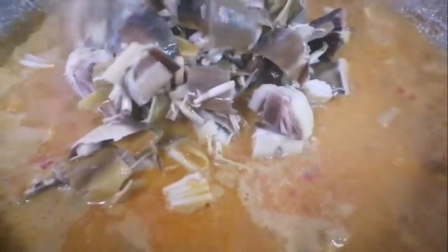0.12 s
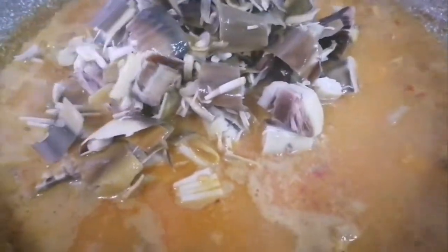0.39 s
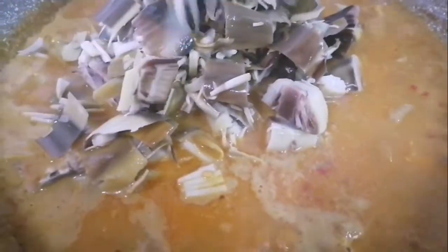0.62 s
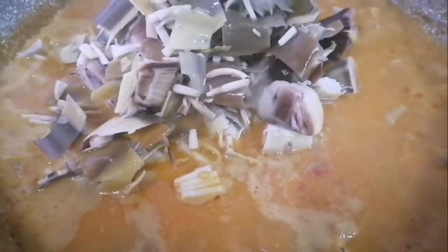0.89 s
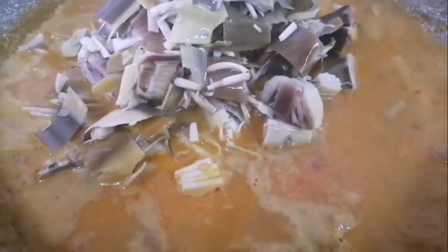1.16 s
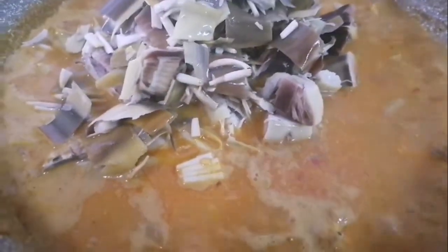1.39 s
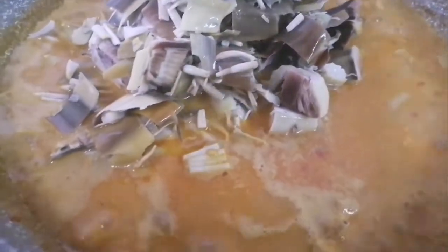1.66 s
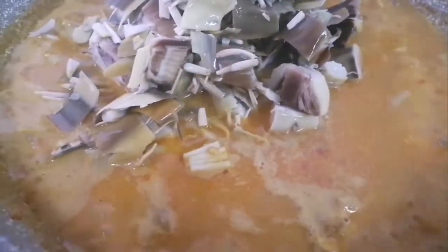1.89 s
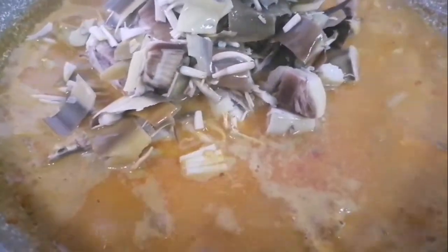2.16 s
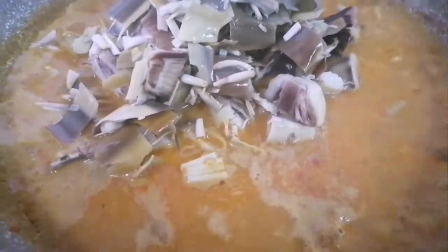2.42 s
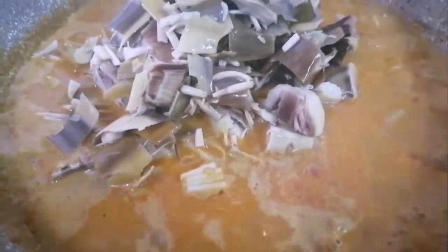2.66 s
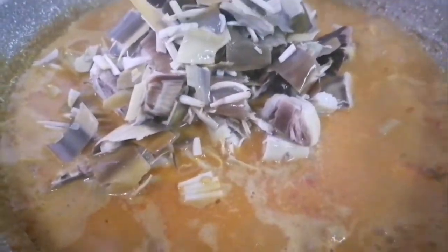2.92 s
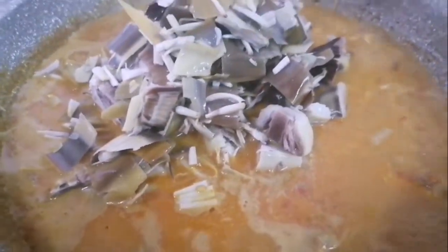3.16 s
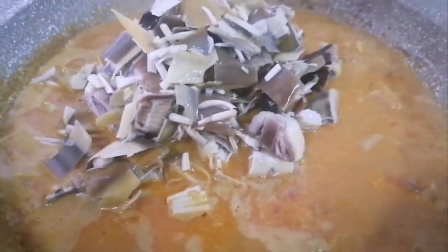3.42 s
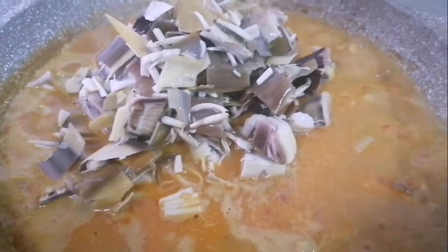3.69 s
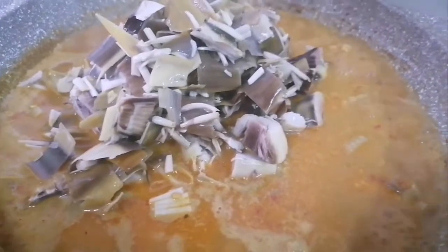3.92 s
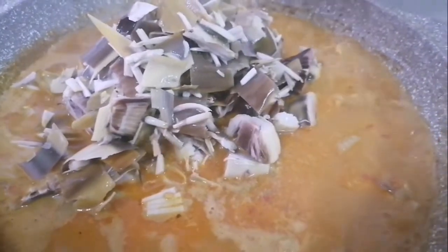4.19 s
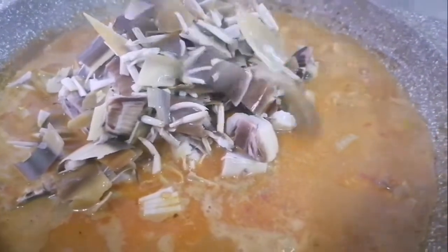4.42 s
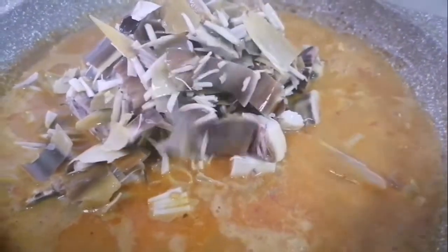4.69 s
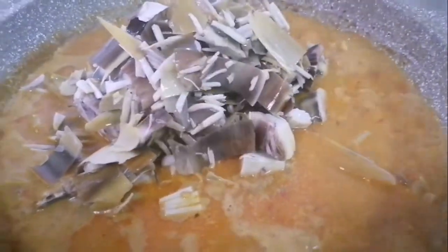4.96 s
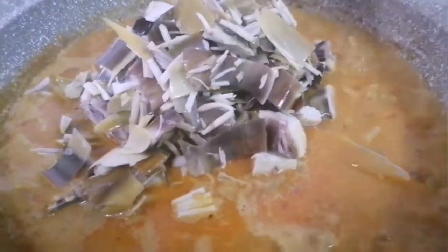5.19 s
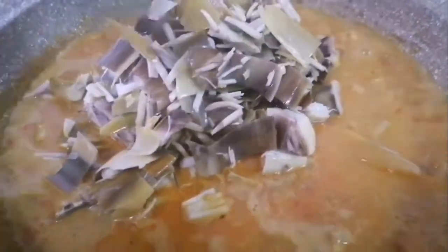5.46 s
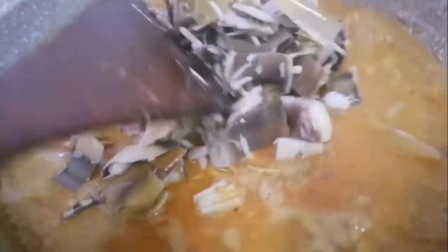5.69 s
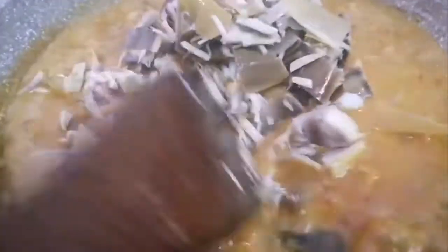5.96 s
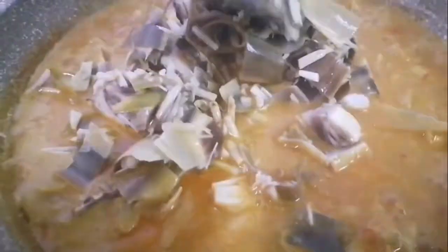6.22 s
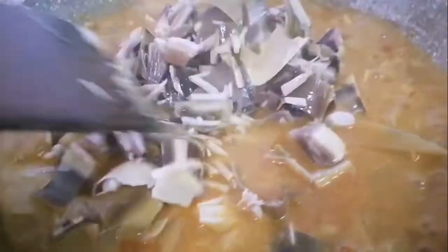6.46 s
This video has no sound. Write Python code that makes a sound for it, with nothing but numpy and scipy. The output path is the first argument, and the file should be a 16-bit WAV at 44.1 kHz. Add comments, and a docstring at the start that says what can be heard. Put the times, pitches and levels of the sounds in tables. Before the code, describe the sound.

A wooden spatula knocks and scrapes a hollow bowl in uneven bursts while thick sauce bubbles and pops over a softly hissing gas burner.

```python
"""A gas burner hisses with a low flutter: shaped noise with random gusts. Thick sauce simmers over it, its
bubbles popping as short rising sines and its drops spitting as noise cracks. A wooden spatula knocks and scrapes
a hollow bowl to tip chopped vegetables into the pan: damped modes for the blows, low sines for the bumps,
uneven noise for the strokes. A small kitchen answers with a short decaying noise tail."""
import sys
import numpy as np
from scipy import signal
from scipy.fft import rfft, irfft, next_fast_len
from scipy.io import wavfile
from scipy.ndimage import uniform_filter1d, map_coordinates

SR = 44100
rng = np.random.default_rng(int(sys.argv[2]) if len(sys.argv) > 2 else 0)


def convert_level_to_amplitude(level_db):
    """Map a level in decibels to its linear amplitude factor."""
    exponent = np.asarray(level_db, float) / 20
    return 10 ** exponent


def store_wav(level_fs):
    """Save 16-bit WAV to argv[1]."""
    pcm = np.round(np.clip(np.atleast_2d(level_fs), -1, 1) * 32767)
    wavfile.write(sys.argv[1], SR, pcm.T.astype(np.int16))


N = 290614


def unit(x):
    """Scaled to rms 1."""
    return x / np.sqrt(np.mean(x ** 2) + 1e-20)


def along(points, hz):
    """(Hz, value) points interpolated on a log frequency axis."""
    point_hz, values = np.transpose(points)
    return np.interp(np.log(hz + 1), np.log(point_hz + 1), values)


def curves(rows):
    """One value per sample for each column after the time."""
    knot_s, *columns = np.transpose(rows)
    return [np.interp(np.arange(N) / SR, knot_s, column) for column in columns]


def wobble(rate_hz):
    """A smooth random curve with rate_hz knots a second."""
    knots = rng.standard_normal(int(N * rate_hz / SR) + 4)
    return map_coordinates(knots, [np.arange(N) * rate_hz / SR])


def filtered(x, response):
    """x times a complex response of frequency."""
    size = next_fast_len(N + SR // 2)
    hz = np.fft.rfftfreq(size, 1 / SR)
    return irfft(rfft(x, size) * response(hz), size)[..., :N]


def rush(spectrum, alike):
    """Stereo noise of rms 1, its two sides alike by frequency."""
    def mid_side(hz):
        turn = np.arccos(np.clip(along(alike, hz), -1, 1)) / 2
        return convert_level_to_amplitude(along(spectrum, hz)) * [np.cos(turn), np.sin(turn)]

    mid, side = filtered(rng.standard_normal((2, N)), mid_side)
    return unit(np.array([mid + side, mid - side]))


def patchy(x, depth_db):
    """Random patches of gain over time and frequency."""
    z = signal.stft(x, nperseg=512)[2]
    field = uniform_filter1d(rng.standard_normal(z.shape[1:]), size=10, axis=0)
    field = uniform_filter1d(field, size=8, axis=1)
    return signal.istft(z * convert_level_to_amplitude(depth_db * unit(field)), nperseg=512)[1][:, :N]


def sides(pan_db):
    """Left and right gains for a left-right difference in dB."""
    return convert_level_to_amplitude(np.array([pan_db / 2, -pan_db / 2]))


def add(out, s, sound):
    """Mix a stereo sound in at a time in seconds."""
    start = round(s * SR)
    out[:, start:start + sound.shape[1]] += sound


# Room decay. Each row: frequency in Hz, t60 in s.
ROOM_T60 = [(150, 0.21), (1000, 0.19), (8000, 0.078)]


def kitchen(x):
    """Room answer as decaying noise: each frequency dies at its own speed."""
    hz, t, z = signal.stft(rng.standard_normal((2, SR // 2)), SR, nperseg=256)
    decay = convert_level_to_amplitude(-60 * t / along(ROOM_T60, hz)[:, None])
    tail = signal.istft(z * decay, SR, nperseg=256)[1]
    delayed = np.pad(x, ((0, 0), (300, 0)))
    return signal.fftconvolve(delayed, tail / np.linalg.norm(tail[0]), axes=1)[:, :N]


# Low flame flutter. Each row: time in s, level in dB before the gusts.
FLUTTER_LEVEL = [(0.0, -58), (1.63, -52.5), (4.0, -53), (5.5, -57.5), (6.59, -52.5)]
# Gas hiss spectrum. Each row: frequency in Hz, relative density in dB.
HISS_SPECTRUM = [(130, -47), (220, -0.5), (391, -5.5), (657, -2), (758, -5), (2220, -10.5), (2520, -8),
                 (3300, -11.5), (3740, -18.5), (5360, -5.5), (7670, -14), (8700, -10), (13600, -23),
                 (14900, -16), (16000, -45)]
# Flutter spectrum. Each row: frequency in Hz, relative density in dB.
FLUTTER_SPECTRUM = [(12, -33), (20, -17), (64, -5.5), (97, 1.5), (150, 1.5), (167, -5.5), (199, -2),
                    (260, -49), (340, -49), (570, -120)]
# Stereo likeness of wide noise. Each row: frequency in Hz, left-right likeness 0-1.
LIKENESS = [(60, 0.89), (240, 0.9), (950, 0.55), (3770, 0.0067), (15000, 0.013)]


def burner():
    """A nearly steady, patchy gas jet hisses over the flame's low, unsteady flutter."""
    flutter_db, = curves(FLUTTER_LEVEL)
    gusts = convert_level_to_amplitude(2.5 * wobble(15) + 1.2 * wobble(5))
    jet = patchy(rush(HISS_SPECTRUM, LIKENESS), depth_db=1.5)
    hiss = convert_level_to_amplitude(-55.5 + 0.15 * wobble(4.9) + 1.47 * wobble(24)) * jet
    return hiss + convert_level_to_amplitude(flutter_db) * gusts * rush(FLUTTER_SPECTRUM, LIKENESS)


# Bubbles popping at set times, mostly loud, a few faint. Each row: start in s, level in dB, nominal pitch in Hz.
TIMED_POPS = [(0.3765, -30, 2620), (0.9562, -33.5, 2440), (1.03, -37.5, 1870), (1.222, -43, 2200),
              (1.29, -45, 1710), (1.358, -39, 2290), (1.738, -33, 1930), (1.851, -41, 1120),
              (2.061, -36, 1200), (2.175, -36.5, 2190), (2.2354, -45, 2500), (2.577, -32.5, 1850),
              (2.617, -31.5, 2540), (2.692, -35, 1410), (2.716, -33, 1900), (3.0254, -29.5, 1570),
              (3.244, -35, 1900), (3.317, -36, 1800), (3.6514, -34.5, 1670), (4.0187, -36, 1970),
              (4.875, -52, 1170), (4.969, -41, 2500), (5.266, -31, 1940), (5.38, -40.5, 1470),
              (5.596, -42.5, 1110), (6.163, -31.5, 1160), (6.2637, -34.5, 1900), (6.4, -37, 2400)]


def bubbles():
    """Bubbles burst through the thick sauce: a few cycles each, the pitch rising."""
    random_count, decay_cycles = 220, 2.5
    start_s = rng.random(random_count) * N / SR
    level_db = -43 - 11 * rng.random(random_count)
    pitch_hz = 1600 * np.exp(0.45 * rng.standard_normal(random_count))
    pops = [*TIMED_POPS, *np.c_[start_s, level_db, pitch_hz]]
    lives = np.exp(rng.normal(0, 0.3, len(pops)))
    out, t = np.zeros((2, N + SR)), np.arange(SR // 20) / SR
    for (s, db, hz), life in zip(pops, lives):
        cycles = hz * t
        tone = np.sin(2 * np.pi * cycles * (0.969 + 0.0074 * cycles))
        pop = tone * np.exp(-cycles / (life * decay_cycles)) * (1 - np.exp(-t / 0.0001))
        add(out, s, convert_level_to_amplitude(db) * np.outer(sides(rng.normal(-4.5, 6.1)), pop))
    return out[:, :N]


# Drops spitting on the hot rim. Each row: start in s, level in dB before the treble filter.
LOUD_SPITS = [(0.444, -14), (2.199, -15), (2.2478, -21), (2.2702, -6.5), (2.2844, -5), (2.3064, -28),
              (4.9252, -17), (5.9944, -25)]
# Treble spectrum of spits, edge ticks and rasps. Each row: frequency in Hz, relative density in dB.
RASP_SPECTRUM = [(590, -66), (1000, -11), (1940, -19), (2410, -7.5), (3710, -18.5), (4570, -12),
                 (8650, -11.5), (14900, -24.5), (16000, -48)]


def spits():
    """Tiny bright cracks of sauce, a few loud and many faint: noise bursts dying within milliseconds."""
    faint = rng.random((150, 2))
    faint_rows = np.c_[faint[:, 0] * N / SR, -49 - 8 * faint[:, 1]]
    out, t = np.zeros((2, N + SR)), np.arange(400) / SR
    for s, db in [*LOUD_SPITS, *faint_rows]:
        add(out, s, convert_level_to_amplitude(db - 60 * t / 0.0075) * rng.standard_normal((2, 400)))
    return filtered(out[:, :N], lambda hz: convert_level_to_amplitude(along(RASP_SPECTRUM, hz)) * hz ** 2 / (hz ** 2 + 4000 ** 2))


# The bowl moves to the left. Each row: time in s, left-right difference in dB, scaled by each user.
BOWL_PAN = [(0, -3), (2.9, -7.5), (3.05, 5), (5.4, 4)]


def swing(s):
    """Left-right dB of the bowl at a time in seconds."""
    return np.interp(s, *np.transpose(BOWL_PAN))


# The bowl bumps against hand and counter. Each row: start in s, push level in dB, push pitch in Hz.
BUMPS = [(0.425, -29, 151), (0.47, -18, 163), (0.971, -48, 111), (1.13, -39, 73), (1.324, -44.5, 100),
         (1.577, -26.5, 143), (1.999, -37.5, 142), (3.056, -27.5, 123), (3.106, -41, 150),
         (3.559, -30.5, 234), (3.663, -37.5, 55.6), (4.22, -37.5, 73), (4.297, -30, 143), (4.648, -32, 120),
         (4.698, -31.5, 134), (4.996, -26, 170), (5.007, -30.5, 232), (5.029, -32, 190)]


def thumps():
    """A soft low push that dies in a few cycles; the counter answers late with its slow mode."""
    out, t = np.zeros((2, N + SR)), np.arange(SR // 3) / SR
    counter = convert_level_to_amplitude(-0.5) * np.sin(2 * np.pi * 65 * t) * (t / 0.044) * np.exp(1 - t / 0.033)
    rested = np.diff([-1, *np.transpose(BUMPS)[0]]) > 0.03  # quick rebounds do not reach the counter
    for (s, db, hz), fresh in zip(BUMPS, rested):
        push = np.sin(2 * np.pi * hz * t) * (1 - np.exp(-t / 0.00058)) * np.exp(-t * hz / 2.1)
        # the hand cushions hard bumps, so the counter's answer grows less than the push
        answer = fresh * convert_level_to_amplitude(0.3 * db - 38) * counter
        add(out, s, np.outer(sides(1.2 * swing(s)), convert_level_to_amplitude(db) * push + answer))
    return out[:, :N]


def strokes(rows, shape):
    """Sum of (start s, length s, dB) strokes, each shaped over its progress 0-1."""
    t = np.arange(N) / SR
    return sum(convert_level_to_amplitude(db) * shape(np.clip((t - s) / length, 0, 1)) for s, length, db in rows)


# Vegetables slide along the bowl. Each row: start in s, length in s, rumble level in dB before shaping.
SLIDES = [(0.137, 0.097, -43.5), (0.5, 0.058, -45.5), (0.64, 0.048, -48), (1.052, 0.085, -50),
          (1.245, 0.13, -45), (1.506, 0.26, -43.5), (1.69, 0.09, -48), (1.91, 0.098, -41),
          (2.0, 0.095, -46), (2.2, 0.06, -42), (2.278, 0.045, -39), (2.653, 0.15, -44.5),
          (2.816, 0.08, -39), (3.34, 0.085, -53.5), (4.411, 0.066, -44.5), (5.06, 0.15, -44),
          (5.33, 0.048, -51)]
# The spatula's edge rasps. Each row: start in s, length in s, level in dB before shaping.
EDGE_RASPS = [(0.137, 0.068, -54.5), (2.111, 0.19, -44.5), (2.215, 0.12, -43.5), (2.653, 0.096, -52.5),
              (3.614, 0.073, -46), (5.007, 0.28, -57.5), (5.78, 0.41, -55)]
# Slip noise driving the bowl. Each row: frequency in Hz, relative density in dB.
SLIP_SPECTRUM = [(150, -42), (320, -8), (600, 2), (800, -8), (1200, -19), (2500, -11.5), (4000, -31)]


def drag():
    """Uneven slips rumble in the bowl, fading along the stroke, while the edge rasps in the treble, growing."""
    t = np.arange(N) / SR
    # pieces shaken by each blow slide on
    settle_delay_s, settle_length_s, settle_db = 0.0048, 0.15, -32
    settling = [(s + settle_delay_s, settle_length_s, db + settle_db) for s, db, *_ in BLOWS]
    rumble = strokes(SLIDES + settling, lambda u: (u * (1 - u)) ** 0.5 * (1.5 - u))
    rasp = strokes(EDGE_RASPS, lambda u: np.sin(np.pi * u ** 1.6))

    def hollow(f, width_hz=45):
        """Bowl resonances beside a direct path."""
        modes = BOWL_MODES[0] + BOWL_MODES[1] + BOWL_MODES[2]
        return 1.26 + sum(convert_level_to_amplitude(db) * 1j * f * width_hz / (c * c - f * f + 1j * f * width_hz)
                          for c, db, _ in modes)

    lumps = convert_level_to_amplitude(5 * wobble(70) + 2 * wobble(20))
    slips = filtered(lumps * rush(SLIP_SPECTRUM, LIKENESS), hollow)
    low = rumble * unit(slips) * sides(swing(t))
    # loose pieces rattle against the wall as the bowl is scraped
    clatter = convert_level_to_amplitude(8 * wobble(150))
    rattle_noise = rush([(500, -23), (1000, 6), (2600, -18.0), (4000, -19)], [(1000, 0.19)])
    rattle = convert_level_to_amplitude(-12) * rumble * unit(clatter * rattle_noise)
    grit = convert_level_to_amplitude(4.5 * wobble(200) + 1.5 * wobble(40))
    edge = patchy(grit * rush(RASP_SPECTRUM, [(1000, 0.064)]), depth_db=2.5)
    return low + rattle + rasp * unit(edge)


def ring(modes, t, scatter_rad):
    """Damped modes, each strike varying their strength, pitch and phase."""
    total = 0
    for hz, db, t60_s in modes:
        decay = convert_level_to_amplitude(db + rng.normal(0, 1) - 60 * t / t60_s)
        phase = 2 * np.pi * hz * rng.normal(1, 0.019) * t + rng.normal(0, scatter_rad)
        total = total + decay * np.sin(phase)
    return total


# Blows on the bowl. Each row: start in s, overall level in dB, then relative levels in dB of the deep modes,
# the upper modes and the high modes (hardness of contact).
BLOWS = [(0.165, -45, 1, -0.5, -22), (0.426, -26, -8.5, -4, -16), (0.467, -25, -4.5, -1.5, -22),
         (0.49, -31.5, 0, -1.5, -2.5), (1.061, -43.5, -3.5, -2.5, -31), (1.114, -42, -2, -8, -25),
         (1.1437, -37, -3.5, -3.5, -5), (1.322, -44, -13, 2.5, -10), (1.469, -30, -26, 0.5, -25),
         (1.558, -33, -4, 0, -5.5), (1.573, -28, -6, -15, -3.5), (1.686, -44, -3, 12, -1.5),
         (1.726, -46, -5, -6, -2.5), (1.897, -26.5, -6, 1.5, -3), (1.987, -26, -6.5, -10, -6),
         (2.589, -48, -1, 2, -1.5), (2.672, -50, -3, 4.5, 8), (2.742, -19.5, -8, -6.5, -22),
         (2.76, -31, -6, 2.5, -14), (3.058, -25, 5, -0.5, -2.5), (3.11, -30.5, -4, -4, -6),
         (3.401, -34, -3.5, -3.5, -13), (3.664, -36.5, -3, 3, -3.5), (4.215, -27, 1, 4, -0.5),
         (4.29, -19, -4.5, -1.5, -8.5), (4.304, -29.5, -3, -3, -26), (4.645, -30, -3, 3.5, -4.5),
         (4.696, -26.5, 7.5, 3.5, -0.5), (4.9945, -26, 0.5, -2, -5.5), (5.23, -24, -1, 1.5, -15),
         (5.236, -20.5, -5.5, -15, -14), (5.332, -37, -1, -6, -32), (5.341, -38.5, -5, 1, -25)]
# Bowl modes in four groups: deep, middle, upper, high. Each row: frequency in Hz, relative level in dB, t60 in s.
BOWL_MODES = [
    [(281, -4, 0.099), (311, 2.5, 0.085)],
    [(493, 2, 0.056), (552.5, 9.5, 0.043)],
    [(709, 8, 0.045), (792, 1, 0.032), (861, 6, 0.013)],
    [(1086, 3.5, 0.026), (1355, 4, 0.019), (1800, 5, 0.017), (1980, 6, 0.014), (2234, -5, 0.034),
     (2647, -5.5, 0.029), (3075, 11.5, 0.0037)],
]


def knocks():
    """Each blow rings the bowl's modes; the contact chatters briefly and the edge ticks, louder when harder."""
    attack_s, attack_db_per_hard_db = 0.0012, 0.32  # harder blows rise faster
    dull_below_db, brighten_span_db = -2, 2.5
    tick_db, deep_left_db = 12.5, 3
    out, ticks, t = np.zeros((2, N + SR)), np.zeros((2, N + SR)), np.arange(SR // 4) / SR
    tick_decay = convert_level_to_amplitude(5 - 60 * t / 0.013) + convert_level_to_amplitude(-5 - 60 * t / 0.043)
    for s, db, deep_db, upper_db, hard_db in BLOWS:
        chatter = 0.022 * convert_level_to_amplitude(-60 * t[:1500] / 0.04) * rng.standard_normal(1500)
        chatter[0] = -1  # the blow itself
        deep = np.outer(sides(deep_left_db), convert_level_to_amplitude(deep_db) * ring(BOWL_MODES[0], t, 0.044))
        middle = ring(BOWL_MODES[1], t, 0.0096)
        upper = convert_level_to_amplitude(upper_db) * ring(BOWL_MODES[2], t, 0.57)
        rise = 1 - np.exp(-t / (attack_s * convert_level_to_amplitude(-attack_db_per_hard_db * hard_db)))
        body = sides(swing(s))[:, None] * (deep + middle + upper) * rise
        # short waves reach the two ports by different paths
        high = np.array([ring(BOWL_MODES[3], t, 1.0), ring(BOWL_MODES[3], t, 0.72)])
        high = high * (1 - np.exp(-t / 0.0005))
        pair = body + convert_level_to_amplitude(hard_db) * sides(1.3 * swing(s) - 2)[:, None] * high
        add(out, s, convert_level_to_amplitude(db) * signal.fftconvolve(pair, chatter[None], axes=1))
        # a weak tick comes from a softer contact and is duller
        grit = rng.standard_normal((2, len(t)))
        bright = np.clip((hard_db - dull_below_db) / brighten_span_db, 0, 1)
        tick = bright * grit + (1 - bright) * uniform_filter1d(grit, size=4)
        tick_gain = convert_level_to_amplitude(db + hard_db + tick_db) * sides(0.31 * swing(s))[:, None]
        add(ticks, s, tick_gain * tick * tick_decay)
    return out[:, :N] + filtered(ticks[:, :N], lambda hz: convert_level_to_amplitude(along(RASP_SPECTRUM, hz)))


def scene():
    """Bowl and pan close to the microphone, the room behind, the burner without room."""
    near = knocks() + thumps() + drag() + bubbles() + spits()
    near[1] = np.roll(near[1], 7)  # samples; the sound reaches the left port first
    return near + convert_level_to_amplitude(-13.0) * kitchen(near) + burner()


def roll_off(x):
    """The treble ends steeply here."""
    return signal.sosfilt(signal.butter(12, 16460, fs=SR, output="sos"), x)


# How the two ports differ. Each row: frequency in Hz, left-right difference in dB.
PORT_BALANCE = [(500, 2), (1300, -3), (4400, -5), (8000, -0.5), (15000, -0.5)]


def record(dry):
    """The two microphone ports colour the sound differently, with nothing above 16.3 kHz."""
    heard = filtered(dry, lambda hz: sides(along(PORT_BALANCE, hz)) * (hz < 16300))
    return roll_off(heard)


dry = scene()
out = record(dry)
store_wav(out)
```